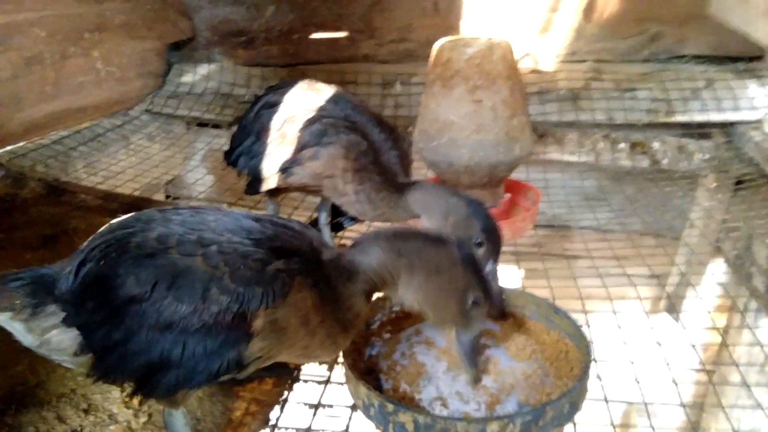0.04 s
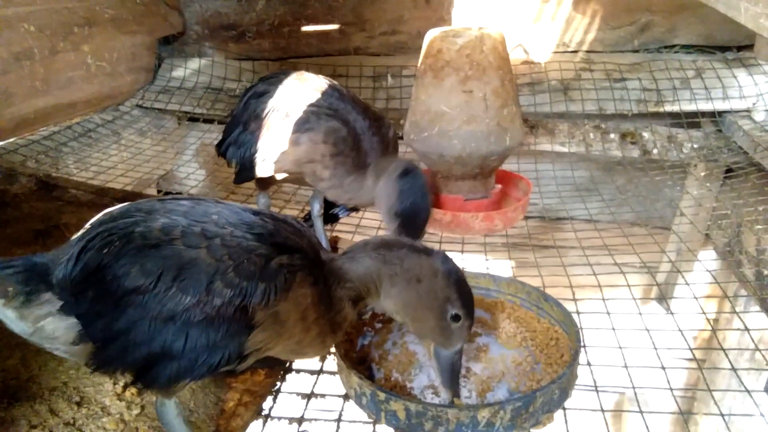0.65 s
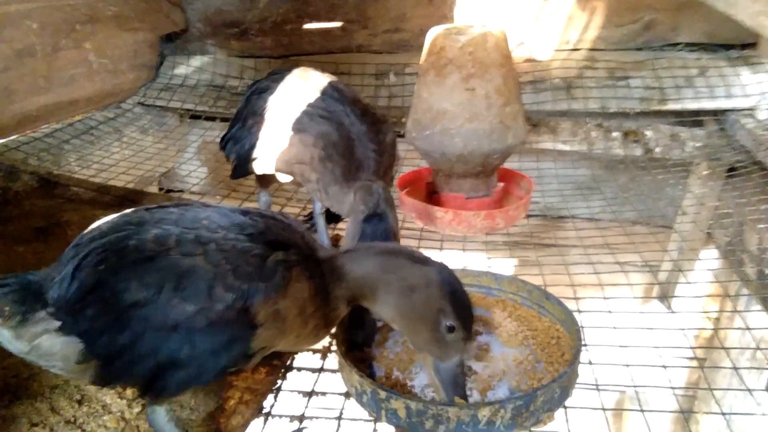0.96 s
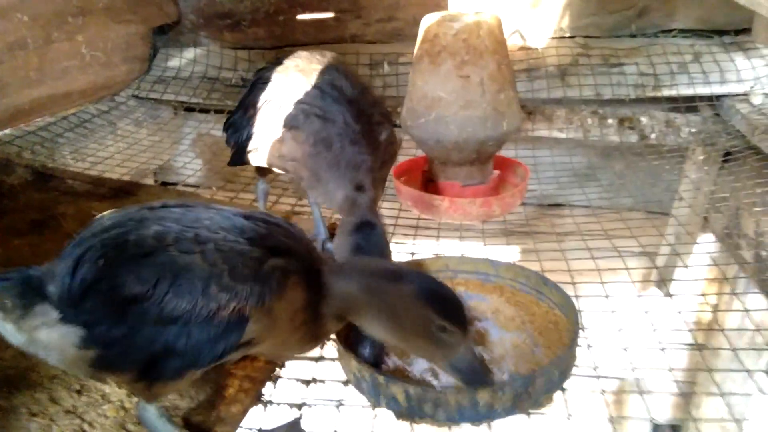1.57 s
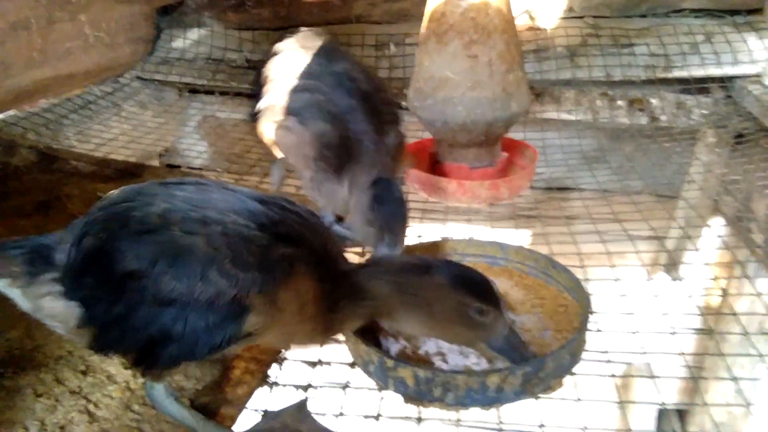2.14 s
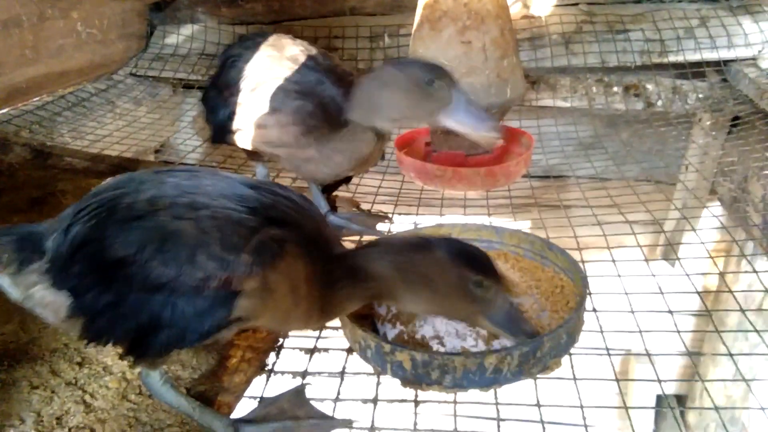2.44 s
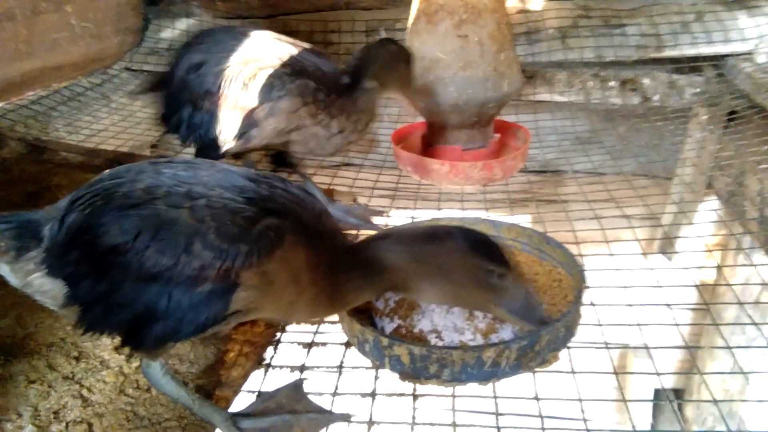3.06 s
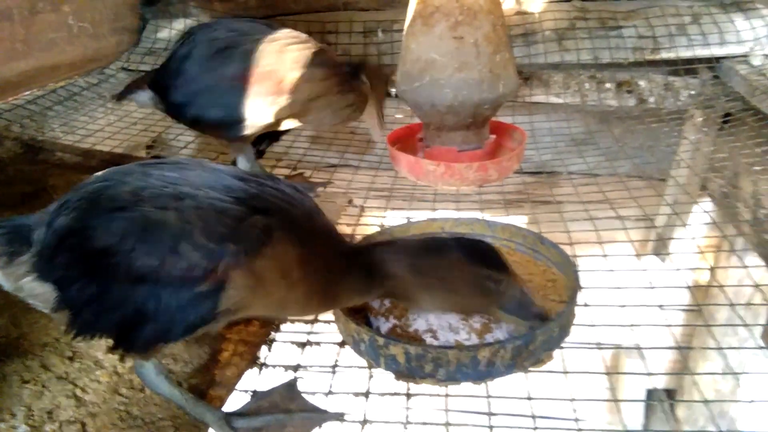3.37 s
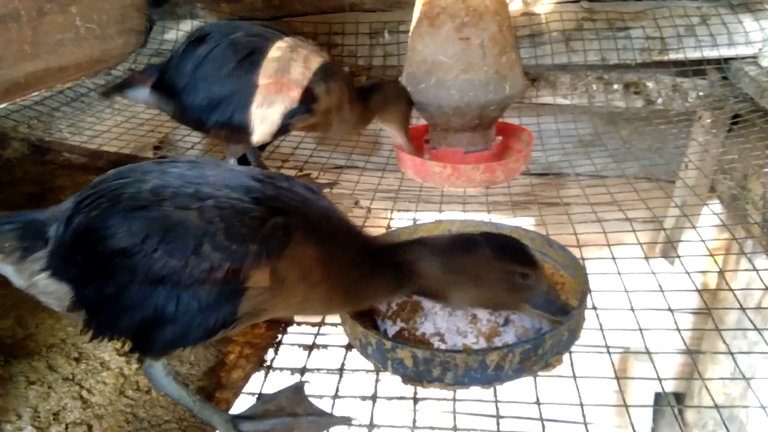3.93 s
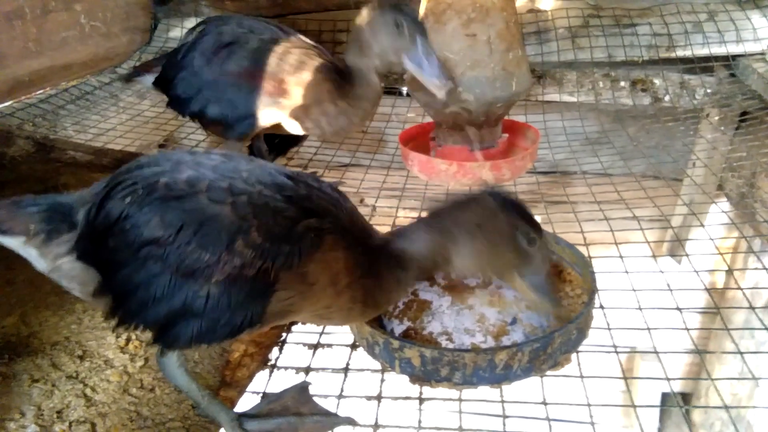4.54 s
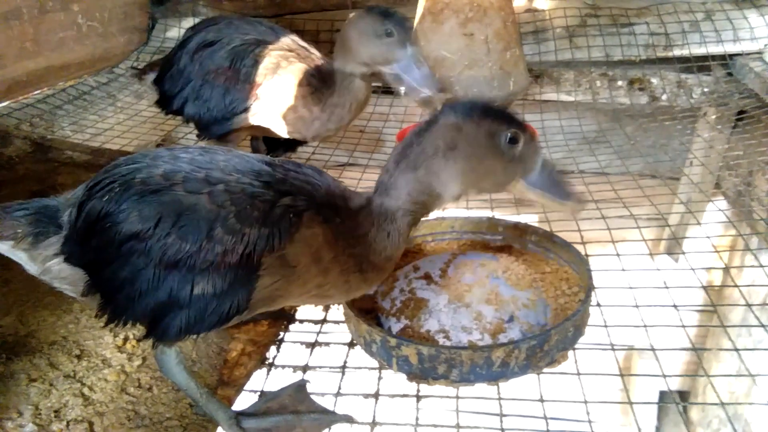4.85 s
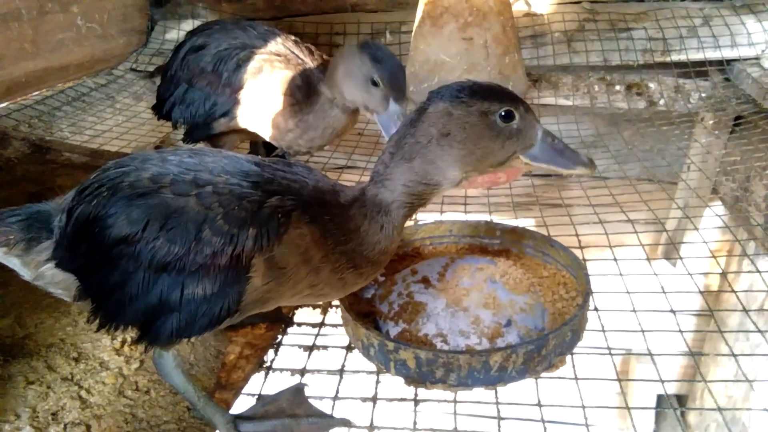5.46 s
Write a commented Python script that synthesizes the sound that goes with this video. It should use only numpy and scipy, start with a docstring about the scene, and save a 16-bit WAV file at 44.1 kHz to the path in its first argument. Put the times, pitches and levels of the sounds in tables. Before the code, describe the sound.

Young ducks peep throughout in a small wood and wire cage. The nearest repeats a thin, high whistle a little more than twice a second, each one swelling as it falls and fluttering slightly off the close boards. Softer sliding peeps and faint whistles fill the gaps. Bills knock on a feed bowl at the start and around 1 second, followed by a soft splash of wet mash. A run of sharp taps comes from about 1.5 to 2.2 seconds, with quiet dabbling and small nasal puffs from the birds. The loudest peep falls near 3.7 seconds. Between 3.3 and 4.6 seconds, more knocks mix with bright claw ticks on wire and fine wet crackling. From about 4.2 seconds, quick arching peeps join in and the calling gets busier, with another small splash near 5.4 seconds. A faint low rumble runs underneath.

```python
"""Young ducks peep while they dabble wet mash from a bowl in a wood and wire cage.
Each peep is a thin, high whistle from the voice box, and the loud ones swell as they fall.
Echoes off the close boards mix with the sliding pitch and make it flutter.
Bills knock on the bowl, snuffle and patter in the mash, and feet tick on the wire over a low rumble."""
import sys
import numpy as np
from scipy import signal
from scipy.fft import rfft, irfft
from scipy.io import wavfile
from scipy.ndimage import uniform_filter1d

SR = 44100
rng = np.random.default_rng(int(sys.argv[2]) if len(sys.argv) > 2 else 0)


def bounce(signal):
    """Save signal as a 16-bit WAV file at the path given by the first command-line argument."""
    frames = np.transpose(np.atleast_2d(signal))
    limited = np.clip(frames, -1, 1)
    pcm = np.round(limited * 32767).astype(np.int16)
    wavfile.write(sys.argv[1], SR, pcm)


N = 246959
TIME = np.arange(N) / SR


def amp(db):
    """Turns decibels into a gain."""
    return 10 ** (np.asarray(db) / 20)


def evened(x):
    """Scales a signal to an average (rms) level of 1."""
    return x / np.sqrt(np.mean(x ** 2) + 1e-20)


def look_up(points, hz):
    """Reads between the rows of a table, with frequency on a log scale."""
    freqs, values = np.transpose(points)
    return np.interp(np.log(hz + 1), np.log(freqs + 1), values)


def add(mix, start, sound):
    """Mixes a sound in at a start time in seconds."""
    part = mix[max(round(start * SR), 0):][:len(sound)]
    part += sound[:len(part)]


def noise(spectrum, size=N):
    """Noise whose lows and highs follow a table of levels."""
    gains = amp(look_up(spectrum, np.fft.rfftfreq(size, 1 / SR)))
    return evened(irfft(rfft(rng.standard_normal(size)) * gains, size))


def wander(rate_hz):
    """A random wobble, mostly slower than the given rate."""
    hz = np.fft.rfftfreq(N, 1 / SR)
    return evened(irfft(rfft(rng.standard_normal(N)) / (1 + (hz / rate_hz) ** 2), N))


def humps(rows):
    """One smooth rise and fall in level for each row."""
    return sum(amp(db) * np.exp(-(2 * (TIME - middle) / length) ** 2) for middle, db, length in rows)


def voice(notes, level_db, jitter, shimmer, octave_db):
    """The voice box whistles an almost pure tone; jitter shakes its pitch and shimmer its level."""
    # What the throat lets through of the tone and of its octave: (frequency [Hz], level [dB])
    throat = [(2400, 0), (2900, 3.5), (3400, 0.5), (4400, 1), (4900, 1), (5300, -4.5), (5600, -7),
              (6000, -11.5)]
    throat_octave = [(5000, 11.5), (7000, -6), (8300, -6.5), (9200, -17.5), (12000, -26.5)]
    out = np.zeros(N)
    waver = evened(wander(rate_hz=450) + wander(rate_hz=60))
    tremble = wander(rate_hz=90)
    for start, pitch, gain in notes:
        t = TIME[:len(pitch)]
        span = (round(start * SR) + np.arange(len(t))) % N
        phase = 2 * np.pi * np.cumsum(pitch * (1 + jitter * waver[span])) / SR
        fade = np.clip(np.minimum(t, t[-1] - t) / .005, 0, 1)
        octave = amp(octave_db + look_up(throat_octave, 2 * pitch)) * np.sin(2 * phase)
        level = gain * amp(look_up(throat, pitch)) * fade * (1 + shimmer * tremble[span])
        add(out, start, level * (np.sin(phase) + octave))
    return amp(level_db) * out


def glide(start, length, from_hz, to_hz, bow_hz, db, roundness):
    """A note that slides along an upward-bowed curve, loudest in the middle."""
    progress = np.arange(0, length, 1 / SR) / length
    bow = np.maximum(1 - (2 * progress - 1) ** 2, 0)
    return start, from_hz + (to_hz - from_hz) * progress + bow_hz * bow, amp(db) * bow ** roundness


def thin_whistles():
    """Ducks further back whistle faintly, at an almost even level."""
    # Whistles: (start [s], length [s], first pitch [Hz], last pitch [Hz], upward bow [Hz], level [dB])
    whistles = [ (0.000, 0.034, 5240, 5230, 20, -60), (0.064, .045, 4640, 4110, 18, -69),
                (0.121, .060, 4400, 3740, 10, -68), (0.299, .222, 5140, 3470, 980, -54),
                (0.808, 0.39, 5070, 5270, 190, -65.5), (0.820, .110, 4790, 3500, 130, -60.5),
                (0.968, 0.042, 5300, 4500, 10, -60.5), (1.12, 0.038, 5360, 4800, 150, -61),
                (1.74, 0.066, 5440, 5380, 10, -64), (2.509, 0.12, 4670, 4320, 210, -68),
                (2.930, 0.066, 5050, 4660, 80, -63), (2.943, 0.17, 5520, 3910, 750, -57.5),
                (3.432, 0.14, 4940, 4860, 200, -55.5), (3.684, 0.12, 5150, 4300, 110, -62.5),
                (3.958, 0.18, 4900, 4360, 290, -51.5), (4.442, 0.14, 4930, 4500, 79, -56),
                (5.100, 0.16, 2573, 2470, 2.7, -52), (5.400, 0.044, 2520, 2460, 5, -52)]
    notes = [glide(*row, roundness=.29) for row in whistles]
    return voice(notes, level_db=1, jitter=.0016, shimmer=.18, octave_db=-39)


def rumble():
    """A low rumble grows as the birds shift about."""
    # Its slow rise and fall: (time [s], level [dB])
    levels = [(0, -53.5), (1, -54.5), (2.1, -51.5), (2.8, -53.5), (3.3, -51), (4.4, -50.5), (5, -53.5),
              (5.6, -53.5)]
    # Its deep tone: (frequency [Hz], level [dB])
    spectrum = [(20, -15.5), (45, -29.5), (68, 5), (80, -1.5), (120, -2), (170, -2.5), (240, -11.5),
                (400, -16), (900, -49), (6000, -47.5)]
    return amp(np.interp(TIME, *np.transpose(levels)) + 1.8 * wander(rate_hz=9)) * noise(spectrum)


def cushioned(t, contact_s=.0002):
    """A soft, wet bill takes a moment to press home, which dulls each click."""
    return 1 - np.exp(-(t / contact_s) ** 2)


def dabbling(clicks_per_s=130, spread_db=12.5, click_fade_s=.015, idle_db=-62):
    """Bills sieve the mash: tiny wet clicks over a soft wash."""
    # Bouts of eager feeding: (middle [s], level [dB], length [s])
    bouts = [(1.3, -79, .14), (2.02, -64.5, 0.22), (3.38, -55.5, .08), (4.2, -61, 0.72), (5.6, -65, 0.053)]
    # The tone of one click and of the wash: (frequency [Hz], level [dB])
    smack = [(150, -15), (350, 3.5), (550, 4.5), (1000, -5.5), (2200, 7), (4000, -7.5), (6000, -13.5),
             (10000, -32), (15500, -39)]
    wash = [(100, -14.5), (300, 0), (500, -4), (900, 1.5), (1500, -0.5), (3000, -2.5), (4600, -5.5),
            (6000, -19.5), (8000, -26.5), (10000, -45.5), (15500, -54)]
    clicks = rng.random(N) < clicks_per_s / SR
    clicks = clicks * amp(spread_db * np.minimum(rng.exponential(1, N), 2.6))
    kinds = rng.integers(0, 8, N)
    patter, t = np.zeros(N), TIME[:1024]
    for kind in range(8):
        grain = noise(smack, size=len(t)) * cushioned(t) * amp(-60 * t / click_fade_s)
        patter += signal.oaconvolve(clicks * (kinds == kind), grain)[:N]
    return (amp(idle_db) + humps(bouts)) * (amp(1) * noise(wash) + amp(-1.5) * evened(patter))


def lull_db():
    """How far the sound drops away in the quiet moments, with soft edges."""
    # Quiet moments: (start [s], end [s], depth [dB])
    lulls = [(0.031, 0.048, 10.5), (0.172, 0.209, 15.5), (0.863, 0.985, 16), (1.535, 1.612, 20),
             (1.914, 1.957, 12), (2.207, 2.364, 17.5), (2.537, 2.761, 18.5), (3.026, 3.136, 19),
             (3.857, 3.94, 18.5), (4.711, 4.778, 11), (5.182, 5.248, 6)]
    drop = sum(float(depth) * ((TIME > start) & (TIME < end)) for start, end, depth in lulls)
    return uniform_filter1d(drop, size=900)


def knocks(level_db=2, crack_fade_s=.075, snap_s=.004):
    """A bill strikes the bowl: a short crack, and the bowl rings briefly."""
    # Strikes: (time [s], peak level [dB], treble tilt [dB per tenfold rise in frequency])
    strikes = [(0.0497, -38, -19.5), (0.114, -66, -13), (0.21, -36.5, -7), (1.046, -35, -16),
               (1.459, -34, -10), (1.619, -45, -20), (1.646, -35.5, 16), (1.691, -32.5, -9),
               (1.734, -27.5, -6), (1.778, -35.5, 11), (1.856, -37, -3), (1.961, -42.5, -17),
               (1.997, -37.5, 0.5), (2.081, -41, 6), (2.126, -34.5, -6), (2.158, -47.5, -4),
               (3.351, -31.5, -50), (3.385, -34, -7), (3.431, -30, 18), (3.717, -37, -2),
               (3.954, -36, 22.5), (4.059, -34.5, 17), (4.139, -32, 13), (4.16, -46, 5), (4.184, -40.5, 13),
               (4.252, -59, 15), (4.315, -42.5, 28), (4.406, -42.5, -10), (4.416, -35.5, -2)]
    # The bowl's ringing tones: (frequency [Hz], level [dB], time to fade by 60 dB [s])
    bowl = [(580, -19, 0.56), (970, -1, 0.084), (983, 9, 0.083), (1239, 4, 0.13), (1613, -14, 0.027),
            (1750, -9.5, 0.18), (2297, 1, 0.11), (2760, -8.5, 0.18), (3230, -5.5, 0.048)]
    # The tone of the crack: (frequency [Hz], level [dB])
    spectrum = [(150, -23.5), (330, -2), (550, -12), (1000, 9.5), (2200, 13), (3500, -4.5), (5000, -11.5),
                (7000, -25.5), (15000, -34.5)]
    out, t = np.zeros(N), TIME[:4096]
    for start, peak_db, tilt in strikes:
        ring = np.zeros(len(t))
        for hz, db, fade_s in bowl:
            phase = 2 * np.pi * hz * rng.uniform(.93, 1.03) * t + rng.uniform(0, 2 * np.pi)
            ring += amp(db - 60 * t / fade_s) * np.sin(phase)
        tilted = [(hz, db + tilt * np.log10(min(hz, 4000) / 1200)) for hz, db in spectrum]
        crack = noise(tilted, size=len(t)) * amp(-60 * t / crack_fade_s)
        snap = 1 + 1.2 * np.exp(-t / snap_s)  # the first contact stands out
        blow = (evened(crack) + evened(ring)) * snap
        add(out, start, amp(peak_db + level_db) * cushioned(t) * blow / abs(blow).max())
    return out


def snuffles():
    """Ducks blow their nostrils clear: hollow puffs of air."""
    # Puffs: (middle [s], level [dB], length [s])
    puffs = [(0.118, -48, 0.035), (0.366, -56, 0.15), (0.702, -47, 0.068), (0.987, -55.5, 0.049),
             (1.437, -44.5, 0.052), (1.825, -46, 0.062), (2.119, -52, 0.082), (2.407, -52, 0.072),
             (2.749, -56.5, 0.027), (3.18, -49, 0.063), (3.412, -58.5, 0.14), (3.511, -47.5, 0.041),
             (3.794, -52, 0.028), (4.093, -51.5, 0.073), (4.408, -44.5, 0.011), (4.662, -54, 0.075)]
    # Their hollow tone: (frequency [Hz], level [dB])
    spectrum = [(200, -9), (450, -10.5), (650, -0.5), (950, -1), (1300, -8), (2000, -26.5), (5000, -45.5),
                (12000, -68.5)]
    return humps(puffs) * noise(spectrum)


def voice_break(t, flip_s=.002):
    """Goes from 0 to 1 around t = 0, as a voice flips into its low range."""
    return .5 + .5 * np.tanh(t / flip_s)


def near_peeps(sag_hz_per_s=3000, bend_hz=139, break_hz=610, twin_hz=443):
    """The duck at the bowl holds a quiet high note that swells as it falls, then breaks lower."""
    # Peeps: (loudest moment [s], level [dB], held pitch [Hz], lead-in [s], lead-in level [dB],
    # fall time [s], loudest moment to break [s], loudest moment to end [s])
    peeps = [ (0.274, -32, 5160, .140, -56, 0.046, .038, 0.0344),
             (0.661, -31, 5180, 0.15, -54, 0.039, 0.028, 0.035),
             (1.085, -28.5, 5180, 0.15, -54.5, 0.031, 0.029, .045),
             (1.646, -35.5, 4950, 0.15, -62, 0.051, 0.019, 0.032),
             (2.068, -29, 5010, 0.15, -51.5, 0.046, 0.031, 0.033),
             (2.43, -25, 5140, 0.13, -56.5, .040, 0.021, 0.049),
             (2.828, -26, 5140, .125, -54, 0.047, 0.028, 0.048),
             (3.226, -27, 5160, .120, -54.5, 0.035, 0.026, 0.055),
             (3.656, -20.5, 5380, 0.15, -54.5, 0.047, 0.011, 0.029),
             (4.051, -27.5, 5215, 0.13, -51.5, 0.043, 0.036, 0.065),
             (4.475, -25, 5390, 0.13, -45.5, .044, .015, 0.037),
             (4.881, -28.5, 5390, 0.13, -48, .056, 0.036, 0.076),
             (5.335, -24.5, 5350, 0.14, -59, 0.05, 0.028, 0.046),
             (5.578, -33, 5500, 0.066, -79, 0.034, 0.016, .030)]
    swell_db_per_s, fade_db_per_s, break_db = 287.5, 161.5, 13
    notes = []
    for peak, db, held_hz, lead_s, lead_db, fall_s, break_s, end_s in peeps:
        t = np.arange(-lead_s, end_s, 1 / SR)
        low = voice_break(t - break_s)
        held = held_hz - sag_hz_per_s * (t + fall_s)
        fall = 2800 + (3719 - 2800) * np.exp(-t / fall_s)
        hz = -bend_hz * np.logaddexp(-held / bend_hz, -fall / bend_hz)  # smoothly takes the lower one
        hz -= break_hz * low
        opened = .5 + .5 * np.tanh((4500 - hz) / 213)  # the voice opens up below 4500 Hz
        swell = opened * amp(db + np.minimum(swell_db_per_s * t, -fade_db_per_s * t) - break_db * low)
        lead = amp(lead_db) * np.minimum((t + lead_s) / .028, 1)
        notes.append((peak - lead_s, hz, lead + swell))
        notes.append((peak - lead_s, hz + twin_hz, amp(-1) * lead))  # the voice box's other side
    return voice(notes, level_db=1, jitter=.009, shimmer=.65, octave_db=-36.5)


def soft_peeps():
    """Gentle peeps slide evenly down in pitch."""
    # Peeps: (start [s], length [s], first pitch [Hz], last pitch [Hz], level [dB])
    peeps = [ (0.389, .098, 4020, 2504, -45), (0.499, 0.08, 3514, 2720, -51.5),
             (1.178, 0.066, 4430, 3550, -54), (1.302, 0.12, 4230, 2393, -45),
             (1.665, 0.066, 4610, 3560, -52.5), (1.957, 0.088, 4400, 2800, -50.5),
             (2.333, 0.078, 4630, 3800, -62), (2.868, .132, 4536, 2664, -45.5),
             (3.111, 0.093, 3440, 2525, -54.5), (3.396, 0.14, 4734, 2650, -48.5),
             (3.474, 0.0283, 3110, 2720, -40.5), (3.761, 0.042, 3970, 2510, -48),
             (3.938, 0.069, 4950, 3320, -44), (3.99, 0.032, 2870, 2440, -47),
             (4.084, 0.073, 4310, 2310, -41.5), (4.322, 0.067, 4570, 2566, -41.5),
             (4.761, 0.08, 4500, 2720, -43.5), (5.223, 0.072, 4500, 2740, -40),
             (5.478, 0.089, 3960, 3030, -43.5)]
    notes = [glide(*row, bow_hz=38.7, db=db, roundness=.36) for *row, db in peeps]
    return voice(notes, level_db=4, jitter=.018, shimmer=.64, octave_db=-33.5)


def arched_peeps(edge_hz=4100, low_from_hz=3200, low_to_hz=2438, low_s=.032):
    """The voice swells through a high arch, then plunges into a short, sinking note."""
    # Peeps: (plunge time [s], level [dB], top pitch [Hz], arch length [s], low note level [dB])
    peeps = [ (0.777, -38, 5450, 0.11, -45.5), (4.230, -37.5, 5070, 0.09, -46),
             (4.441, -37, 5370, 0.093, -41), (4.65, -35, 5380, 0.087, -42.5),
             (4.856, -35, 5340, 0.071, -41.5), (5.078, -34, 5490, 0.091, -40),
             (5.298, -34, 5460, 0.077, -38.5), (5.546, -34, 5790, 0.11, -38.5)]
    notes = []
    for plunge, db, top_hz, arch_s, low_db in peeps:
        t = np.arange(-arch_s, low_s, 1 / SR)
        left = np.maximum(-t / arch_s, 0)  # share of the arch still to come; its top is at .74
        sunk = np.maximum(t / low_s, 0)  # share of the low note already sung
        low = voice_break(t)
        arch_hz = top_hz - (top_hz - edge_hz) * abs(1 - left / .74) ** 2.1
        arch_db = db - 22.5 * np.maximum(left - .12, 0)
        hz = (1 - low) * arch_hz + low * (low_from_hz + (low_to_hz - low_from_hz) * sunk)
        gain = amp((1 - low) * arch_db + low * (low_db - 2.5 * sunk))
        catch = 1 - .63 * np.exp(-(t / .0035) ** 2)  # the voice catches as the arch gives way
        notes.append((plunge - arch_s, hz, catch * gain))
    return voice(notes, level_db=2.5, jitter=.0072, shimmer=.93, octave_db=-26)


def splashes(grain_db=4.5):
    """Flung mash lands as a grainy burst that dies away."""
    # Landings: (time [s], level [dB], rise [s], time to fade by 60 dB [s])
    landings = [(1.212, -41, 0.0081, 0.63), (5.433, -43.5, 0.0027, 0.53)]
    # Their wet tone: (frequency [Hz], level [dB])
    spectrum = [(150, -16.5), (500, -14.5), (1100, -6), (1500, 0.5), (2200, -2.5), (3000, -1.5),
                (4600, -12), (6000, -21.5), (9000, -29.5), (15500, -44)]
    swell = np.zeros(N)
    for start, db, rise_s, fade_s in landings:
        t = TIME - start
        rise_db = -15 * np.clip(1 - t / rise_s, 0, 1)
        swell += (t > 0) * amp(db + rise_db - 60 * np.maximum(t - rise_s, 0) / fade_s)
    return swell * noise(spectrum) * amp(grain_db * wander(rate_hz=1400))


def ticks(level_db=-7, rise_s=.0016):
    """Claws flick the wire floor: short, bright scrapes."""
    # Flicks: (time [s], level [dB], time to fade by 60 dB [s])
    flicks = [(2.141, -45, 0.04), (3.3517, -40, 0.037), (3.4287, -29, 0.046), (3.4354, -34, 0.016),
              (3.955, -62, 0.03), (4.168, -45, 0.03), (4.201, -43, 0.025), (4.2697, -41, 0.036),
              (4.2927, -31.5, 0.064), (4.2984, -39, 0.036), (4.3414, -39, 0.03), (4.387, -37.5, 0.03),
              (4.4117, -35, 0.035), (4.4842, -39.5, 0.04), (4.56, -36, 0.023)]
    # Their bright tone: (frequency [Hz], level [dB])
    spectrum = [(500, -57.5), (2500, 16), (5000, 7.5), (8000, -2), (10000, -8), (15500, -14.5)]
    out, t = np.zeros(N), TIME[:2048]
    for start, db, fade_s in flicks:
        swell = np.minimum(t / rise_s, 1) * amp(db + level_db - 60 * np.maximum(t - rise_s, 0) / fade_s)
        add(out, start - rise_s / 2, noise(spectrum, size=len(t)) * swell)
    return out


def squelches(pops_per_s=400, spread_db=4, pop_fade_s=.018):
    """In the churned mash, tiny bubbles burst as a fine, bright crackle."""
    # The hardest churning: (middle [s], level [dB], length [s])
    churning = [(4.35, -59.5, 0.49)]
    # The tone of the bubbles: (frequency [Hz], level [dB])
    spectrum = [(500, -4), (2500, 13), (6000, -2), (9000, -13), (15500, -11.5)]
    pops = (rng.random(N) < pops_per_s / SR) * amp(spread_db * np.minimum(rng.exponential(1, N), 3))
    energy = signal.oaconvolve(pops ** 2, amp(-120 * TIME[:1024] / pop_fade_s))[:N]
    return humps(churning) * evened(np.sqrt(abs(energy)) * noise(spectrum))


def boards(x, distance, strength):
    """Quick echoes off the boards make a sliding whistle flutter; distance scales their delays."""
    # Echoes: (delay [ms], gain [ratio])
    echoes = [(1.596, 0.07), (3.952, 0.408), (4.794, 0.237), (5.362, 0.146), (7.002, 0.21), (7.766, 0.175),
              (9.23, 0.095), (11.104, 0.357), (12.28, 0.302), (14.261, 0.108), (15.899, 0.139),
              (17.405, 0.105), (23.683, 0.112), (25.101, 0.237)]
    hz = np.fft.rfftfreq(2 * N, 1 / SR)
    reflected = sum(gain * np.exp(-2j * np.pi * hz * distance * ms / 1000) for ms, gain in echoes)
    response = 1 + strength * reflected
    return irfft(rfft(x, 2 * N) * response / np.sqrt(np.mean(abs(response) ** 2)))[:N]


def scatter(x, level_db, fade_s):
    """Mesh, bowl and bodies throw back a spray of small echoes that breaks up each slide."""
    t = TIME[:SR // 10]
    echoes = rng.choice([-1., 1.], len(t)) * (rng.random(len(t)) < .05) * (t > .004)
    echoes *= amp(-60 * t / fade_s)
    return x + amp(level_db) * signal.fftconvolve(x, evened(echoes) / np.sqrt(len(t)))[:N]


def cage_tail(x):
    """Many echoes blur into a short tail, each pitch range dying at its own speed."""
    # How long the cage rings: (frequency [Hz], time to fade by 60 dB [s])
    fade_times = [(200, 0.11), (1000, 0.64), (3500, 0.16), (8000, 0.61), (15000, 0.27)]
    size = SR // 2
    echoes = rng.choice([-1., 1.], size) * (rng.random(size) < .06) * (TIME[:size] > .008)
    hz, t, bands = signal.stft(echoes, SR, nperseg=256)
    tail = signal.istft(bands * amp(-60 * t / look_up(fade_times, hz)[:, None]), SR, nperseg=256)[1]
    return signal.fftconvolve(x, tail / np.linalg.norm(tail))[:N]


def scene():
    """Mixes peeps from several places in the cage with the feeding noises and the rumble."""
    near = boards(near_peeps(), distance=1, strength=.84)
    others = boards(arched_peeps(), distance=.9, strength=1.15)
    others += boards(soft_peeps() + thin_whistles(), distance=.7, strength=1.1)
    near = scatter(near, level_db=-17, fade_s=.13)
    others = scatter(others, level_db=-12, fade_s=.1)
    feeding = knocks() + ticks() + boards(splashes() + snuffles(), distance=1.2, strength=.52)
    tail = cage_tail(amp(-18) * near + amp(-20.5) * others + amp(-19) * feeding)
    lull = lull_db()
    background = (rumble() + tail) * amp(-lull) + (dabbling() + squelches()) * amp(-.85 * lull)
    hiss = amp(-87.5) * evened(rng.standard_normal(N))  # the microphone's own noise
    return ((near + others) * amp(-.7 * lull) + feeding + background + hiss)[None]


def record(dry):
    """Cuts away the very highest treble, above 15600 Hz."""
    low_pass = signal.firwin(511, 15600, window=("kaiser", 9), fs=SR)
    return signal.oaconvolve(dry, low_pass[None], "same")


dry = scene()
out = record(dry)
bounce(out)
```